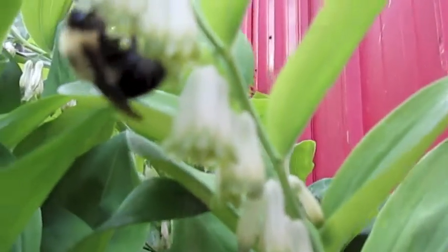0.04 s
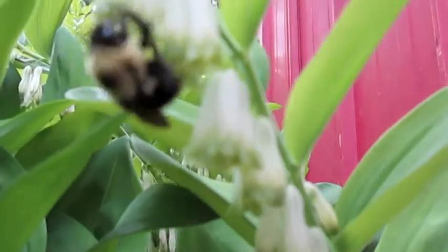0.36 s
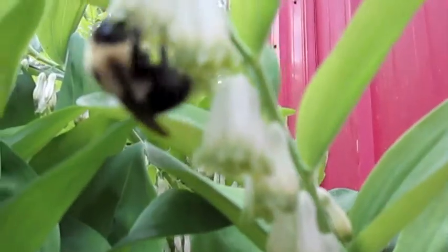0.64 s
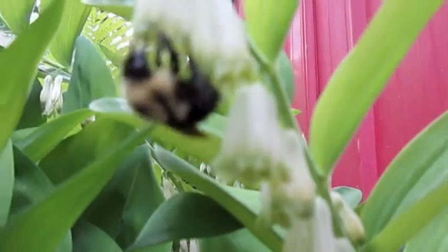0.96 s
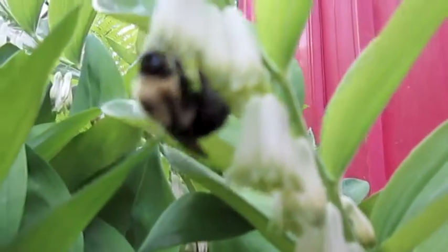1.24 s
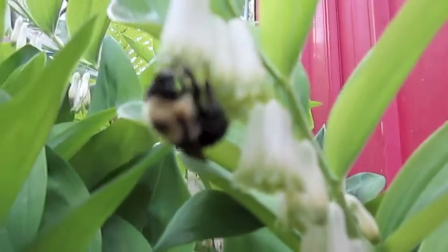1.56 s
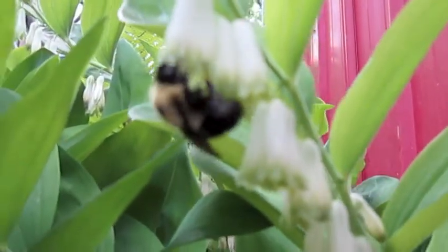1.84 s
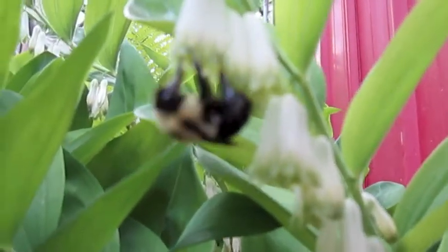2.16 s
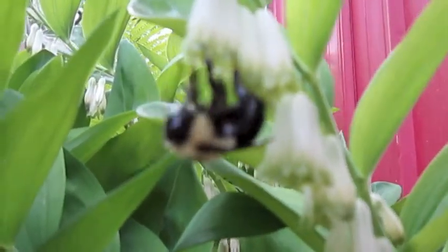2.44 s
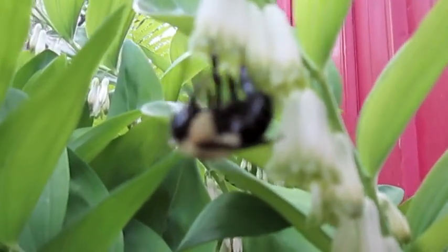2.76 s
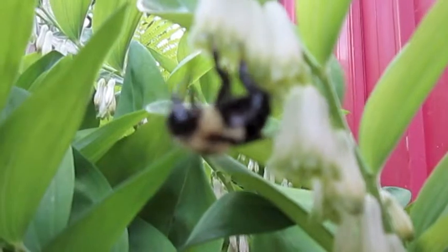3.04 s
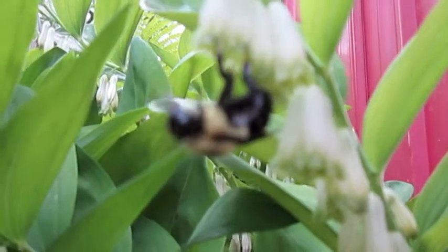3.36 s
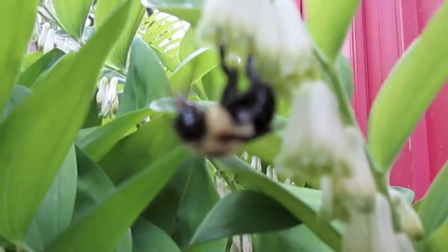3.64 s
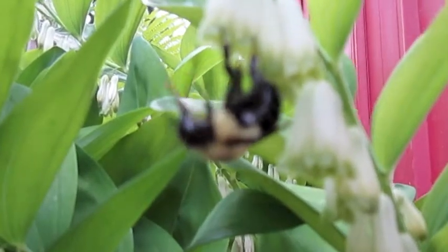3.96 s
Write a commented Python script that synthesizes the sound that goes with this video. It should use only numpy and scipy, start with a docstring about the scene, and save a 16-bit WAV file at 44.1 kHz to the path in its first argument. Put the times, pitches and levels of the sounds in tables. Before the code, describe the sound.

Close, scratchy bursts of bumblebee buzzing with sharp ticks, then quiet garden air and distant chirps.

```python
"""A garden, with the microphone right at a hanging flower. For about two seconds a bumblebee shakes out
pollen in four bouts: squeezes of its flight muscles buzz, the dry blossom rasps once a wing-muscle cycle,
and claws tick on it, the sharpest ticks ducking the recorder's gain. A bird across the garden calls at
0.5 s and twice more as the bee falls quiet. A thud comes at 2.3 s, a low hum swells, and a scrape follows
at 3.3 s. Under the garden air a far engine speeds up and grows louder to the end."""
import sys
import numpy as np
from scipy import signal
from scipy.fft import rfft, irfft
from scipy.io import wavfile
from scipy.ndimage import uniform_filter1d, minimum_filter1d

SR = 44100
rng = np.random.default_rng(int(sys.argv[2]) if len(sys.argv) > 2 else 0)


def transcribe(signal):
    """Save signal, clipped to [-1, 1], as a 16-bit WAV file at the path in sys.argv[1]."""
    frames = np.atleast_2d(signal).T
    limited = np.clip(frames, -1, 1)
    pcm = np.round(limited * 32767).astype(np.int16)
    wavfile.write(sys.argv[1], SR, pcm)


N = 176400


def bee():
    """The bee at the microphone: each muscle stroke drives both the buzz and the blossom's rasp."""
    cycles, strength, roughness = flight_muscles()
    count = np.arange(1, int(cycles[-1]))
    strokes = np.interp(count, cycles, clock())
    returns = np.interp(count + .5, cycles, clock())
    stroke_size, knock_time, knock_size, stroke_time = noise()[:4 * len(count)].reshape(-1, 4).T
    uneven = np.interp(strokes, clock(), roughness)
    tone = strength * buzz(strokes, returns, uneven * stroke_size, uneven * stroke_time)
    return undb(1) * (tone + rasp(cycles, strokes, knock_size, knock_time))


# Muscle squeezes (start [s], length [s], top pitch [Hz], relative level [dB], roughness [0-1])
SQUEEZES = [(.012, 0.079, 309.7, -41.5, 0.92), (.094, 0.045, 274.5, -41.5, 0.55),
            (.132, 0.048, 306.6, -40, 0.3), (.174, 0.064, 298, -42, 0.78), (.268, 0.061, 312, -42.5, 0.33),
            (.67, .046, 351, -36, .4), (.718, .052, 298, -44.5, 0.56), (.764, 0.0432, 299.1, -36, 0.63),
            (.812, 0.076, 318, -37.5, 0.66), (.897, 0.061, 320, -38, 0.71), (1.33, 0.082, 353, -33.5, 0.14),
            (1.41, .06, 319, -33.5, 0.22), (1.748, .042, 332.1, -46, 0.68), (1.79, 0.037, 300.8, -43, .7),
            (1.892, 0.081, 311, -43, .4), (1.974, .038, 272, -40.5, 0.38), (2.092, .052, 316.2, -46.5, .5)]
def flight_muscles(sag=.11, early=.12, wobble=.016):
    """Pitch and level arch through each squeeze, the pitch topping out just before the middle."""
    t, pitch_points, rough_points, strength = clock(), [], [], np.zeros(N)
    for start, length, hz, db, rough in SQUEEZES:
        middle = start + length / 2
        for u in np.linspace(-.8, .8, 9):  # half lengths from the middle
            pitch_points.append((middle + length * u / 2, hz * (1 - sag * (u + early) ** 2)))
        rough_points += [(middle - length / 4, rough), (middle + length / 4, rough)]
        arch = np.maximum(1 - (2 * (t - middle) / length) ** 2, 0)
        strength += undb(db) * arch ** .81
    roughness = curve(sorted(rough_points))
    pitch = curve(sorted(pitch_points)) * (1 + wobble * roughness * walk(130))
    cycles = np.cumsum(pitch) / SR
    return cycles, strength, roughness


# Colour of the buzz, close up (frequency [Hz], gain [dB])
BUZZ_SPECTRUM = [(300, -42), (700, -26), (1050, -6), (1400, -15), (1750, -1), (2800, 0.5), (3800, 3),
                 (4600, 2), (6000, -6), (8000, -14), (15000, -41)]
def buzz(strokes, returns, size_scatter, time_scatter, backstroke=.3):
    """Each stroke is a pulse, and its return a weaker pulse the other way."""
    size, late = undb(3.3 * size_scatter), .00007 * time_scatter
    pulses = clicks(strokes + late, size) - backstroke * clicks(returns - late, size)
    return unit(flower_smear(colour(pulses, BUZZ_SPECTRUM)))


def flower_smear(x, width_hz=600):
    """The flower holds each stroke back: all-pass resonances spread it over a few milliseconds."""
    for hz in (1750, 2400, 2950, 3990, 4690, 5570):
        poles = signal.iirpeak(hz, hz / width_hz, fs=SR)[1]
        x = signal.lfilter(poles[::-1], poles, x)
    return x


# The blossom's rasp, one list a bout (time [s], relative level [dB])
RASP_BOUTS = [
    [(0.0, -36), (0.028, -33.5), (0.044, -28), (0.078, -32.5), (0.084, -37.5), (0.168, -28.5),
     (0.176, -34.5), (0.212, -27.5), (0.236, -36), (0.264, -35), (0.272, -33), (0.282, -30), (0.31, -28.5),
     (0.382, -46.5), (0.41, -33.5), (0.444, -53), (0.452, -43.5), (0.5, -54)],
    [(0.66, -39), (0.666, -54), (0.676, -33), (0.696, -25.5), (0.716, -35.5), (0.726, -28.5), (0.822, -32),
     (0.844, -26.5), (0.892, -40.5), (0.948, -35.5), (0.956, -41), (0.964, -32.5), (1.002, -41),
     (1.01, -50), (1.044, -36.5), (1.056, -55), (1.074, -47), (1.08, -66)],
    [(1.19, -68), (1.198, -51.5), (1.264, -64), (1.268, -44), (1.386, -31), (1.39, -32), (1.452, -28.5),
     (1.506, -35.5), (1.528, -50), (1.538, -42), (1.552, -52), (1.568, -46), (1.582, -57), (1.62, -56)],
    [(1.68, -46.5), (1.694, -49), (1.702, -59), (1.716, -38), (1.75, -34.5), (1.764, -25.5), (1.784, -31),
     (1.834, -32.5), (1.84, -34.5), (1.858, -38.5), (1.92, -27), (1.984, -33.5), (2.0, -31), (2.06, -47.5),
     (2.122, -32.5), (2.178, -50), (2.2, -50)],
]
def rasp(cycles, strokes, size_scatter, time_scatter, grit_decay_cycles=.86, crest=2.3):
    """Each stroke knocks and scuffs the dry blossom, unevenly."""
    knocks = clicks(strokes + .0001 * time_scatter, undb(-3 * np.tanh(size_scatter)))
    grit = noise() * np.exp(-(cycles % 1) / grit_decay_cycles) * undb(2 * np.tanh(walk(250)))
    petals = unit(blossom(unit(knocks) + undb(4.5) * unit(grit)))
    power = uniform_filter1d(petals ** 2, size=64)
    petals = unit(petals / np.sqrt(1 + power / crest ** 2))  # petals can only swing so far
    contact = sum(undb(curve(bout, left=-np.inf, right=-np.inf)) for bout in RASP_BOUTS)
    return contact * petals


# Broad colour of the petals (frequency [Hz], gain [dB])
PETAL_SPECTRUM = [(300, -38), (1300, -34), (2000, -19), (3500, -12.5), (5500, -29.5), (8000, -52),
                  (11000, -48.5), (15000, -46)]
# Their resonances (frequency [Hz], width [Hz], gain [dB])
PETAL_MODES = [(4640, 1310, -2), (5540, 800, 1), (6500, 1260, -10.5), (9360, 2800, -24.5)]
def blossom(x):
    """The thin petals ring briefly in the treble."""
    out = colour(x, PETAL_SPECTRUM)
    for k, (hz, width, db) in enumerate(PETAL_MODES):
        b, a = signal.iirpeak(hz, hz / width, fs=SR)
        ring = signal.lfilter(b, a, signal.lfilter(b, a, x))
        out += (-1) ** k * undb(db) * ring
    return out


# Claw ticks at the microphone (time [s], peak before ducking [dB])
CLAW_TICKS = [(.0745, -17), (0.2726, -7), (0.409, -22), (0.453, -18.5), (.675, -20), (0.9557, -4.5),
              (1.04, -29), (1.115, -27.5), (1.243, -33), (1.27, -31), (1.3308, -24), (1.501, -24),
              (1.7159, -26), (1.8308, -4.5), (1.909, -19), (2.0, -24)]
# Softness of a claw's contact (frequency [Hz], gain [dB])
CLAW_SPECTRUM = [(1000, -5), (3300, -10), (4600, -0.5), (6000, 0.5), (8000, -13), (10000, -3), (12000, -11),
                 (15000, -20)]
def claws(scratch_decay_s=.00076):
    """A claw slips and snaps the petal, with a tiny scratch after it."""
    times, db = np.array(CLAW_TICKS).T
    snap = .18 * noise() * np.exp(-clock() / scratch_decay_s)
    snap[0] = 1
    lead = 64  # samples of room ahead of the snap
    ring = colour(blossom(np.roll(snap, lead)), CLAW_SPECTRUM)[:SR // 20]
    return signal.fftconvolve(clicks(times, undb(db)), ring / np.abs(ring).max())[lead:lead + N]


# Feet on the petals, close up (time [s], half width [s], level [dB])
FOOT_SCRATCHES = [(.6, 0.075, -52), (1.156, .01, -54), (1.655, 0.047, -54.5), (2.28, .003, -41),
                  (2.53, .07, -52.5), (3.175, .012, -53), (3.702, .014, -53.5)]
def feet():
    """Faint grainy scratching as the bee shifts its grip."""
    grip = sum(undb(db) * np.exp(-((clock() - at) / width) ** 2) for at, width, db in FOOT_SCRATCHES)
    return grip * unit(blossom(noise() * undb(3.6 * walk(300))))


# Calls from across the garden (start [s], length [s], relative level [dB])
BIRD_CALLS = [(.5, 0.087, -50.5), (2.143, .3, -46.5), (2.755, 0.26, -44)]
def bird(start_hz=4520, end_hz=3870, fall_s=.1, trill_hz=68, trill_depth_hz=433):
    """A burry, falling call over two clear notes; the higher fades as the lower grows."""
    t, out = clock(), np.zeros(N)
    for start, length, db in BIRD_CALLS:
        age = np.maximum(t - start, 0)
        fall = np.exp(-age / fall_s)
        trill = np.sin(phase(trill_hz * (1 + .11 * walk(60))))
        pitch = end_hz + (start_hz - end_hz) * fall + trill_depth_hz * trill + 150 * walk(500)
        low_note = undb(-2) * (1 - fall) * np.sin(phase(3975 + 10 * walk(40)))
        high_note = undb(-3) * np.exp(-age / .085) * np.sin(2 * np.pi * 4740 * t)
        fade = np.clip(np.minimum(age / .035, (length - age) / .04), 0, 1)
        out += undb(db) * fade * (np.sin(phase(pitch)) + low_note + high_note)
    return garden_echoes(out, wet_db=1.5, t60=.53)


def garden_echoes(x, wet_db, t60):
    """Leaves and walls scatter echoes on the way to the microphone."""
    tail = noise() * undb(-60 * clock() / t60)
    return x + undb(wet_db) * signal.fftconvolve(x, tail / np.linalg.norm(tail))[:N]


def bump(spectrum, at_s, rise_s, decay_s, db):
    """A contact behind the flower: grainy noise swells and dies away."""
    age = clock() - at_s
    grain = unit(colour(noise() * undb(2 * walk(150)), spectrum))
    return undb(db) * grain * np.exp(np.minimum(age / rise_s, -age / decay_s))


# Colour of the thud (frequency [Hz], gain [dB])
THUD_SPECTRUM = [(30, 4), (70, 0), (160, 4), (260, -35), (600, -22), (1400, -19), (2500, -26),
                 (5000, -23.5), (8000, -50), (15000, -75)]
def thud():
    """One dull, sudden contact in the background."""
    return bump(THUD_SPECTRUM, at_s=2.307, rise_s=.005, decay_s=.06, db=-27.5)


# Colour of the scrape (frequency [Hz], gain [dB])
SCRAPE_SPECTRUM = [(100, 8), (400, -2), (1200, -5), (1900, 1), (3200, -6), (5200, -1.5), (7000, -22),
                   (10000, -34), (15000, -60)]
def scrape():
    """One short, scratchy contact in the background."""
    return bump(SCRAPE_SPECTRUM, at_s=3.297, rise_s=.025, decay_s=.052, db=-33)


# Swell of the hum (time [s], level [dB])
HUM_LEVEL = [(0, -69), (2.2, -78), (2.45, -45.5), (3.1, -46), (3.65, -41), (4, -62)]
def low_hum(hz=156.1):
    """A low background tone wavers in level and pitch."""
    level = undb(curve(HUM_LEVEL) + .84 * walk(18))
    return level * np.sin(phase(hz * (1 + .0194 * walk(12))))


# Speed of the far engine (time [s], rate [Hz])
ENGINE_SPEED = [(0, 61.5), (2.3, 65), (2.8, 68.5), (4, 71)]
# Its harmonics (multiple of the rate, level at the end [dB])
ENGINE_HARMONICS = [(3, -46), (5, -52)]
def far_engine(rise_db_per_s=4):
    """Two harmonics carry from far off, climbing as the engine speeds up."""
    turn = phase(curve(ENGINE_SPEED) * (1 + .01217 * walk(15)))
    swell = undb(rise_db_per_s * (clock() - N / SR))
    return swell * sum(undb(db + 2 * walk(10)) * np.sin(k * turn) for k, db in ENGINE_HARMONICS)


# Air all round the microphone (frequency [Hz], gain [dB])
AIR_SPECTRUM = [(15, -29), (25, -5.5), (65, 1), (156, -0.5), (185, -8.5), (230, -8.5), (273, -11.5),
                (393, -12.5), (434, -15), (610, -16), (724, -15.5), (1040, -15), (2510, -27.5),
                (4190, -25.5), (8500, -42.5), (11000, -58), (18700, -120)]
def garden_air(db=-40, top_hz=9000):
    """Soft outdoor noise, mostly low and nearly steady."""
    air = undb(db + .44 * walk(6.57)) * unit(colour(noise(), AIR_SPECTRUM))
    return signal.sosfilt(signal.butter(4, top_hz, fs=SR, output="sos"), air)


# Colour of the recorder's hiss (frequency [Hz], gain [dB])
HISS_SPECTRUM = [(100, -27), (1000, -10), (4000, -19.5), (9000, 0), (12000, 2.5), (15500, 1)]
def recorder_hiss():
    """Faint treble hiss, partly different left and right."""
    left, right, both = (unit(colour(noise(), HISS_SPECTRUM)) for _ in range(3))
    return undb(-68) * np.array([left, right]) + undb(-71) * both


def undb(db):
    return 10 ** (np.asarray(db) / 20)


def unit(x):
    return x / np.sqrt(np.mean(x ** 2) + 1e-20)


def clock():
    return np.arange(N) / SR


def noise():
    return rng.standard_normal(N)


def phase(hz):
    return 2 * np.pi * np.cumsum(hz) / SR


def curve(rows, **ends):
    return np.interp(clock(), *np.array(rows, float).T, **ends)


def walk(rate_hz):
    """Smooth random drift with a spread near 1."""
    step = max(int(SR / rate_hz), 2)
    return unit(uniform_filter1d(np.repeat(noise()[:N // step + 1], step), step)[:N])


def colour(x, points):
    """Filter by (frequency [Hz], gain [dB]) points, rolling off below 20 Hz."""
    hz, db = np.array(points, float).T
    f = np.arange(N // 2 + 1) * SR / N + 1e-3
    gain = undb(np.interp(np.log(f), np.log(hz), db))
    return irfft(rfft(x) * gain / (1 + (20 / f) ** 4), N)


def clicks(times, sizes):
    """Band-limited impulses at exact times."""
    at = np.asarray(times)[:, None] * SR
    index = at.astype(int) + np.arange(-7, 9)
    shape = np.sinc(index - at) * np.sinc((index - at) / 8)
    return np.bincount(np.clip(index, 0, N - 1).ravel(), (shape * sizes[:, None]).ravel(), N)


def scene():
    """The flower up close and the garden behind it, alike in both channels."""
    bumps = thud() + scrape()
    flower = bee() + claws() + feet()
    garden = bird() + garden_air() + low_hum() + far_engine()
    return np.tile(flower + bumps + garden, (2, 1))


def record(dry, ceiling_db=-11, recover_db_per_s=21, top_hz=15650):
    """The recorder's gain drops at once on a peak and creeps back; it adds hiss and cuts the top."""
    peak_db = 20 * np.log10(np.abs(dry).max(axis=0) + 1e-9)
    over_db = np.maximum(peak_db - ceiling_db, 0)
    recovery = recover_db_per_s * clock()
    gain_db = recovery - np.maximum.accumulate(over_db + recovery)
    out = dry * undb(minimum_filter1d(gain_db, size=32)) + recorder_hiss()
    return signal.sosfilt(signal.ellip(10, .1, 70, top_hz, fs=SR, output="sos"), out)


dry = scene()
out = record(dry)
transcribe(out)
```